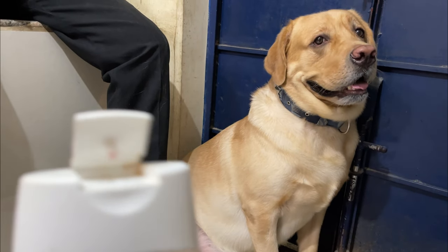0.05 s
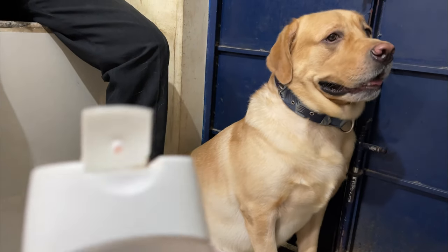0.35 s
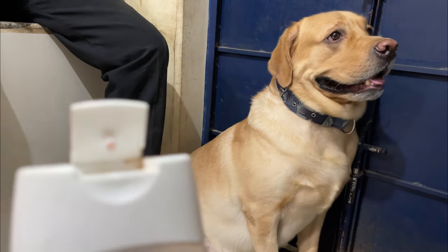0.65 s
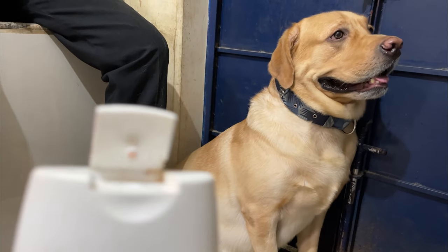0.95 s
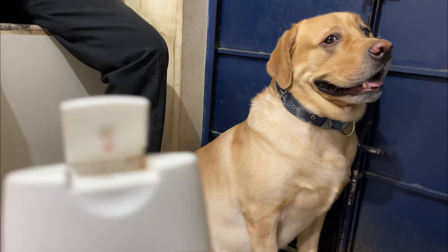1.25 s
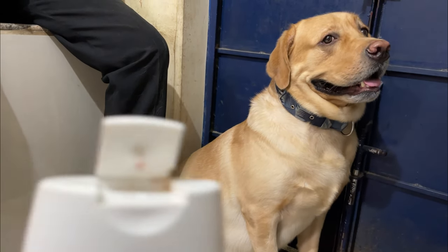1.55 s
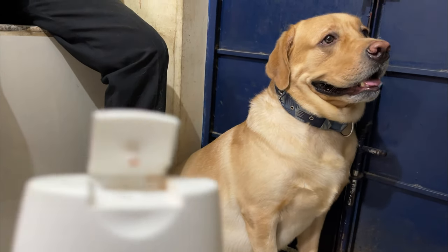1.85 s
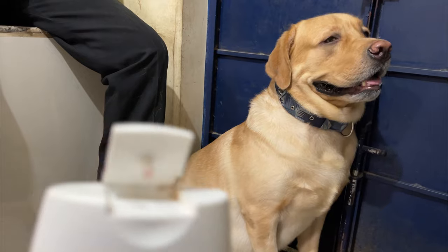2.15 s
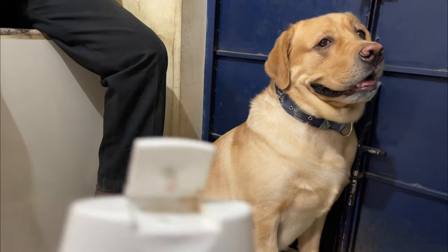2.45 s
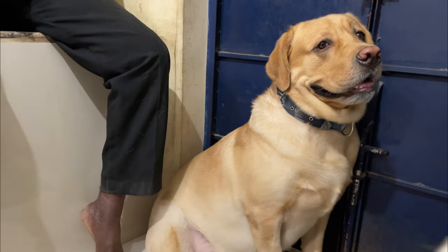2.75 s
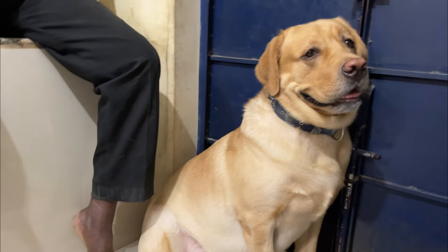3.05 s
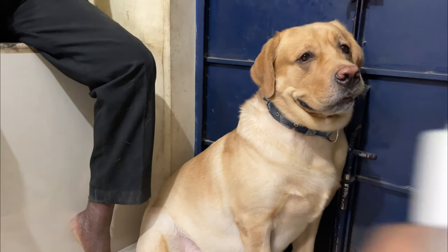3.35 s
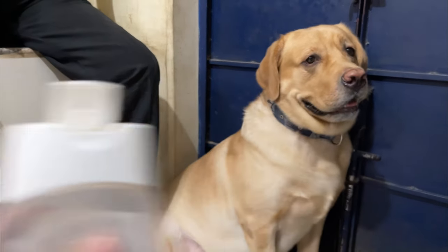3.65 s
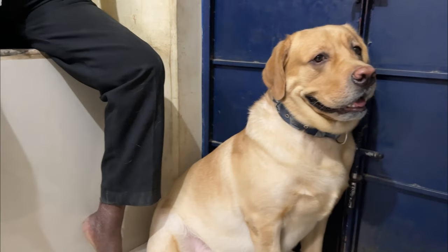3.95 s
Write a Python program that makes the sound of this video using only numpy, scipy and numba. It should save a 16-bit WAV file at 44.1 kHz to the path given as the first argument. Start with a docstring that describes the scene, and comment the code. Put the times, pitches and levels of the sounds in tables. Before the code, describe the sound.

Sharp puffs of air hiss from a plastic bottle, speeding up to a steady pace and weakening near the end. Between them the plastic ticks and springs back, while hands bump faintly near the microphone in a small, quiet room.

```python
"""An empty plastic bottle is squeezed eleven times, close to a phone in a small, quiet room.
Each squeeze pushes a hissing jet of air through the cap and dents the wall with a soft pop.
As the grip loosens, the plastic ticks, air is sucked back in and the wall springs out.
Underneath, the hands thump and rumble, the room murmurs and a far-off horn hoots once."""
import sys
import numpy as np
from scipy import signal
from scipy.fft import rfft, irfft
from scipy.io import wavfile
from scipy.ndimage import uniform_filter1d
from numba import njit

SR = 44100
rng = np.random.default_rng(int(sys.argv[2]) if len(sys.argv) > 2 else 0)


def file_out(sig):
    """Save sig as 16-bit WAV at sys.argv[1]."""
    # one column per channel
    cols = np.atleast_2d(sig).T
    # limit, then scale
    lim = np.clip(cols, -1, 1)
    pcm = np.round(lim * 32767).astype(np.int16)
    wavfile.write(sys.argv[1], SR, pcm)


N = 176400

# Tone of the ringing cap, the broad jet and the highest hiss (pitch [Hz], relative level [dB])
CAP_TONE = [(3000, -36), (5500, -26), (7000, -9.5), (8000, 0.5), (8600, 3), (9300, -2.5), (10100, 3),
            (11000, 0.5), (12000, -8), (13200, -20), (16000, -23)]
JET_TONE = [(150, 3.5), (500, -9), (1100, -11), (1700, -8.5), (2700, -3.5), (3900, -1.5), (4800, -2),
            (6500, 4.5), (9000, -1), (13000, -22)]
HIGH_TONE = [(9000, -25), (12200, 6), (13200, 2), (14200, 7), (16000, 2)]
# Each squeeze and its mix (start [s], length [s], cap [dB], jet [dB], high hiss [dB], whistle [dB])
SQUEEZES = [(0.062, 0.13, -15.5, -27.5, -37, -60), (0.85, .130, -15.5, -29, -40, -58),
            (1.436, .130, -15, -28.5, -35, -52), (1.765, 0.13, -15, -27.5, -30, -44),
            (2.034, 0.13, -15.5, -27, -26.5, -51), (2.317, 0.12, -14.5, -28, -25, -24),
            (2.62, 0.14, -21.5, -32, -28, -29), (2.929, 0.14, -23, -32, -39, -24.5),
            (3.244, 0.14, -24, -32, -45, -26), (3.521, 0.13, -24, -35, -35, -37),
            (3.811, 0.14, -28, -37.5, -35, -56)]
def air_puffs():
    """Pressure builds until the wall dents, then fades; the jet rings the cap and whistles on its edge."""
    t, out = clock(), 0
    sag_db_per_s, release_s = 38, 0.042
    surge_db, surge_width_s, full_dent_db = 6.5, 0.0095, -22.5
    cap = noise(response(CAP_TONE))
    jet = noise(response(JET_TONE) + undb(-2.5) * hollow_bottle())
    high = noise(response(HIGH_TONE))
    whistle = noise(resonance(15530, width_hz=380))
    for (start, length, cap_db, jet_db, high_db, whistle_db), (dent_s, dent_db) in zip(SQUEEZES, DENTS):
        rise = np.clip((t - start) / (dent_s - start), 0, 1) ** 1.78
        sag = undb(-sag_db_per_s * np.clip(t - dent_s, 0, 1))
        fall = np.clip((start + length - t) / release_s, 0, 1) ** 1.2
        flow = rise * sag * fall
        # The pressure peaks just as the wall gives way.
        peak = np.exp(-((t - dent_s) / surge_width_s) ** 2)
        surge = undb(surge_db * undb(dent_db - full_dent_db) * peak)
        out += flow * (surge * (undb(cap_db) * cap + undb(high_db) * high) + undb(jet_db) * jet)
        out += flow ** 2.1 * undb(whistle_db) * whistle  # only a strong flow whistles
    flutter_db = 1.12 * wander(rate_hz=261.7)
    return out * undb(0.64 + flutter_db)


# Notes of the air in the bottle (pitch [Hz], width [Hz], relative level [dB])
BOTTLE_NOTES = [(2587, 57, -8), (3554, 20, 1), (4340, 160, -6.5), (5600, 84, -11), (8430, 63, -15)]
def hollow_bottle():
    """How strongly the air inside the bottle rings at each pitch."""
    return sum(undb(db) * resonance(hz, width) for hz, width, db in BOTTLE_NOTES)


# The wall caves in (time [s], level [dB])
DENTS = [(.1112, -24.5), (.9040, -23.5), (1.4862, -24), (1.8172, -23), (2.0840, -23.5), (2.3638, -25.5),
         (2.6770, -34), (2.9729, -34.5), (3.2998, -29.5), (3.5778, -30), (3.8750, -37)]
def wall_dents():
    """The wall pops inward with a falling note."""
    return sum(-undb(db) * ring(start, 734, 206, glide_s=0.0029, attack_s=0.0012, decay_s=0.013)
               for start, db in DENTS)


# The wall springs back (time [s], level [dB])
REBOUNDS = [(0.302, -30.5), (1.107, -29), (1.6677, -22.5), (1.9812, -19), (2.2539, -18.5), (2.535, -20),
            (2.842, -21.5), (3.146, -20.5), (3.4554, -17), (3.7326, -28.5)]
def wall_rebounds():
    """The wall pops out again with a shorter, steadier note."""
    return sum(undb(db) * ring(start, 450, 348.5, glide_s=0.001, attack_s=0.0046, decay_s=0.0015)
               for start, db in REBOUNDS)


# Tone of the returning air (pitch [Hz], relative level [dB])
INTAKE_TONE = [(1000, -27), (2500, -11), (3600, 0), (4000, -7), (6000, -7), (8500, -3), (11500, -3),
               (15000, -29)]
# Air is sucked back in (start [s], length [s], level [dB])
INTAKES = [(0.273, 0.065, -54.5), (1.06, 0.065, -53), (1.629, 0.083, -50), (1.94, 0.087, -53),
           (2.215, 0.092, -53.5), (2.515, 0.051, -51), (2.80, .07, -60.5), (3.403, .08, -60)]
def air_intakes():
    """Air hisses softly back through the cap and sings in the bottle."""
    air = noise(response(INTAKE_TONE) + undb(12.5) * hollow_bottle())
    return air * sum(undb(db) * swell(start, length) for start, length, db in INTAKES)


# Tone of a tick (pitch [Hz], relative level [dB])
TICK_TONE = [(1000, -4), (3500, 3), (6000, -7), (11000, 15), (16000, -26)]
# The plastic ticks (time [s], relative level [dB])
TICKS = [(0.262, -43), (0.287, -41), (1.048, -41), (1.086, -42), (1.651, -35), (1.966, -39), (2.241, -39),
         (2.524, -47), (2.8295, -43), (3.439, -44), (3.7085, -44)]
def plastic_ticks():
    """The plastic gives tiny cracks as the grip loosens."""
    t, decay_s = clock(), 0.0012
    bursts = sum(undb(db) * (t >= start) * np.exp(-np.abs(t - start) / decay_s) for start, db in TICKS)
    return undb(2) * noise(response(TICK_TONE)) * bursts


# Soft knocks of the hands (time [s], final pitch [Hz], level [dB])
THUMPS = [(0.307, 160, -31), (0.317, 84, -37), (1.109, 162, -40.5), (1.128, 82.4, -30), (1.673, 77, -32),
          (1.950, 115, -28.5), (2.201, 149, -29), (2.210, 65, -26.5), (2.430, 154, -28), (2.454, 68, -32),
          (2.741, 214, -28.5), (2.751, 83.6, -21)]
# Tone of the rumble (pitch [Hz], relative level [dB])
RUMBLE_TONE = [(24, -31), (37, -17.5), (50, 5.5), (65, -4), (84, 4.5), (100, -10), (125, -11), (180, -21),
               (400, -69)]
# How the rumble rises and falls (time [s], level [dB])
RUMBLE_LEVELS = [(0, -46.5), (.22, -43.5), (0.308, -37.5), (.44, -39.5), (.55, -33.5), (.8, -43.5),
                 (1.0, -45.5), (1.139, -36.5), (1.3, -47), (1.58, -49.5), (1.7, -38), (1.878, -46),
                 (2.15, -44.5), (2.23, -39.5), (2.35, -46.5), (2.48, -35.5), (2.68, -49.5), (2.78, -36.5),
                 (2.92, -49), (3.3, -44), (3.55, -42), (3.78, -39.5), (4, -44)]
def hands():
    """The hands make dull knocks and a low rumble."""
    knocks = sum(undb(db) * ring(start, hz * 1.96, hz, glide_s=0.0061, attack_s=0.0085, decay_s=0.014)
                 for start, hz, db in THUMPS)
    rumble_db = np.interp(clock(), *np.array(RUMBLE_LEVELS).T)
    return knocks + noise(response(RUMBLE_TONE)) * undb(rumble_db)


# Tone of the quiet room (pitch [Hz], relative level [dB])
ROOM_TONE = [(40, -3.5), (130, 3.5), (220, -1), (320, -2.5), (450, -9.5), (800, -12.5), (1500, -18),
             (3000, -21), (5000, -26.5), (7000, -25.5), (8600, -23), (10000, -21), (11500, -18.5),
             (12500, -42), (13500, -50), (15000, -58)]
# Faint hisses (start [s], length [s], pitch [Hz], width [Hz], level [dB])
HISSES = [(0.64, 0.12, 8000, 3900, -51), (1.331, 0.086, 7500, 3500, -52.5), (0.18, 1, 1300, 1200, -58)]
def room_murmur():
    """The room murmurs steadily while a few faint hisses come and go."""
    hisses = sum(undb(db) * swell(start, length) * noise(resonance(hz, width))
                 for start, length, hz, width, db in HISSES)
    return undb(-46) * noise(response(ROOM_TONE)) + hisses


# The horn's two notes and their overtones (pitch [Hz], level [dB])
HORN_NOTES = [(310, -52.5), (391, -51), (1572, -66), (1863, -67), (2155, -62), (2775, -58), (3366, -62)]
def distant_horn():
    """A horn hoots once, far outside, its notes blurred by distance."""
    notes = sum(undb(db) * noise(resonance(hz, width_hz=19)) for hz, db in HORN_NOTES)
    return notes * swell(start=3.03, length=0.22)


def room_echo(x):
    """Sound bounces off the nearby hand and phone; the room's walls add a short, weak echo."""
    t = clock()
    near_decay_s, tail_delay_s, tail_fade_s = 0.0063, 0.0028, 0.18
    near = noise(1) * np.exp(-t / near_decay_s)
    tail = noise(1) * undb(-60 * t / tail_fade_s) * (t > tail_delay_s)
    echoes = (undb(-8.5) * unit(near) + undb(-18) * unit(tail)) / np.sqrt(N)
    return x + signal.fftconvolve(x, echoes, axes=1)[:, :N]


def undb(db):
    """Turn decibels into a volume multiplier."""
    return 10 ** (np.asarray(db) / 20)


def unit(x):
    """Scale to an average power of 1."""
    return x / np.sqrt(np.mean(x ** 2))


def clock():
    """Time of every sample in seconds."""
    return np.arange(N) / SR


def pitches():
    """Every pitch in the spectrum, in Hz."""
    return np.arange(N // 2 + 1) * SR / N


def response(points):
    """Strength of every pitch, from a few (Hz, dB) points."""
    hz, db = np.array(points, float).T
    return undb(np.interp(np.log(pitches() + 1), np.log(hz), db))


def resonance(hz, width_hz):
    """A steep peak that favours pitches near hz."""
    return 1 / (1 + ((pitches() - hz) / (.78 * width_hz)) ** 2)


# How much left and right differ (pitch [Hz], level against the shared sound [dB])
STEREO_SPREAD = [(60, -22), (300, -10), (700, -2.5), (1300, -3.5), (2500, -4), (5000, -8.5), (9000, -15),
                 (16000, -30)]
def noise(tone):
    """Noise with the given tone, partly different on the left and right."""
    shared, side = rfft(rng.standard_normal((2, N)))
    spread = side * response(STEREO_SPREAD) * np.array([[1], [-1]])
    return unit(irfft(tone * (shared + spread), N))


def wander(rate_hz):
    """A smooth random drift, about 1 in size."""
    hold = max(int(SR / rate_hz), 1)
    steps = np.repeat(rng.standard_normal(N)[:N // hold + 1], hold)
    return unit(uniform_filter1d(steps, hold)[:N])


def swell(start, length):
    """A rounded rise and fall."""
    return np.abs(np.sin(np.pi * np.clip((clock() - start) / length, 0, 1))) ** .5


def ring(start, first_hz, last_hz, glide_s, attack_s, decay_s):
    """A fading note whose pitch slides as the wall relaxes."""
    t = np.arange(SR // 6) / SR
    cycles = last_hz * t + (first_hz - last_hz) * glide_s * (1 - np.exp(-t / glide_s))
    loudness = np.minimum(t / attack_s, 1) * np.exp(-np.maximum(t - attack_s, 0) / decay_s)
    note = loudness * np.sin(2 * np.pi * cycles)
    return np.pad(note, (int(start * SR), N))[:N]


@njit
def follow(x, attack_s, release_s):
    """Track the loudness, rising over attack_s and falling over release_s."""
    out, level = np.empty(len(x)), 0.
    for i in range(len(x)):
        level += (x[i] - level) / (SR * (attack_s if x[i] > level else release_s))
        out[i] = level
    return out


def auto_volume(x):
    """Loud puffs turn the volume down, so the background dips after them."""
    threshold_db, ratio = -27, 1.31
    loudness = follow(np.abs(x).mean(axis=0), attack_s=0.013, release_s=0.12)
    return x * np.maximum(loudness / undb(threshold_db), 1) ** (1 / ratio - 1)


def scene():
    """The bottle and its echo, over the hands and the background."""
    bottle = air_puffs() + wall_dents() + wall_rebounds() + air_intakes() + plastic_ticks()
    return room_echo(bottle) + hands() + room_murmur() + distant_horn()


# How much louder the left microphone hears (pitch [Hz], level above the right [dB])
LEFT_BOOST = [(60, .5), (300, 2.5), (700, 3.5), (1500, 0.5), (3500, 1), (5200, 7), (6300, 5.5), (7100, 2),
              (8200, 1), (9500, 0)]
def record(dry):
    """The phone favours the left side, delays its treble, evens the volume and cuts the highest hiss."""
    hz = pitches()
    delay_s, in_step_hz, treble_hz, cutoff_hz = .000294, 8600, 7500, 16050
    treble = 1 / (1 + np.exp(-(hz - treble_hz) / 300))
    lag = 2 * np.pi * delay_s * (hz - in_step_hz) * treble
    balance = np.sqrt(response(LEFT_BOOST))
    stereo = irfft(rfft(dry) * np.array([balance * np.exp(-1j * lag), 1 / balance]), N)
    high_cut = signal.ellip(10, .2, 80, cutoff_hz, fs=SR, output="sos")
    return signal.sosfilt(high_cut, auto_volume(stereo))


dry = scene()
out = record(dry)
file_out(out)
```